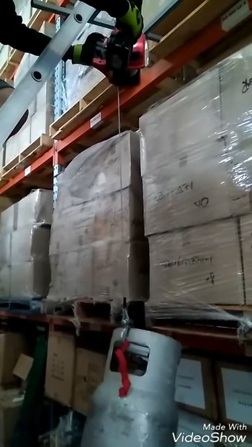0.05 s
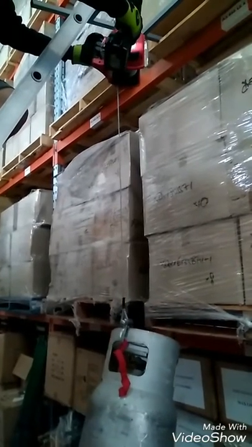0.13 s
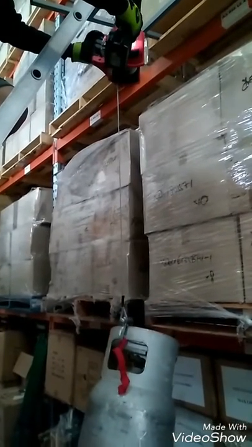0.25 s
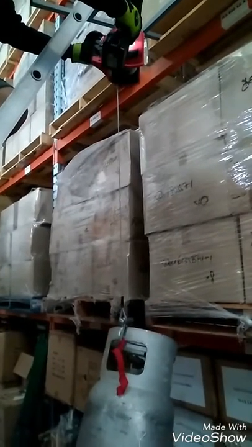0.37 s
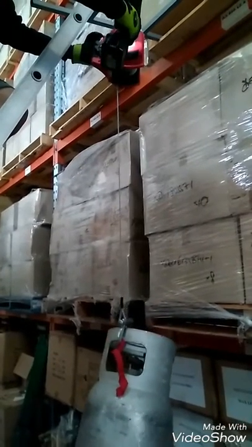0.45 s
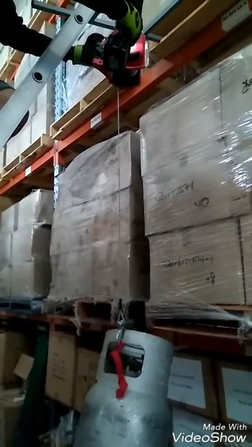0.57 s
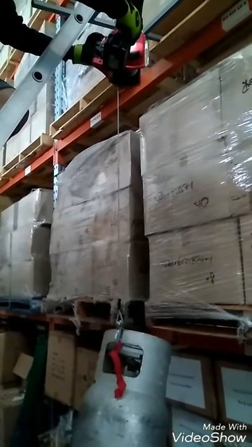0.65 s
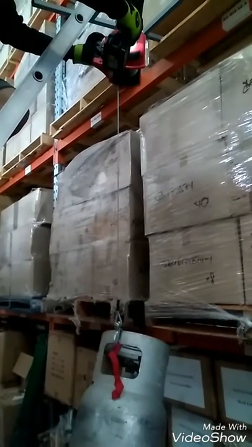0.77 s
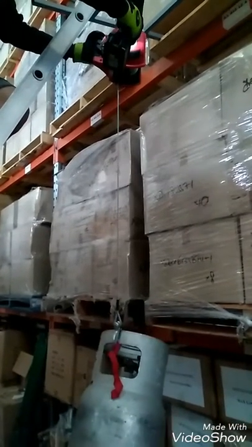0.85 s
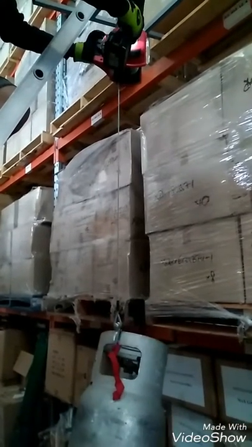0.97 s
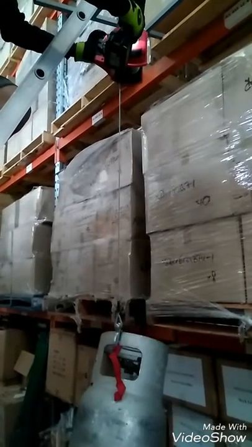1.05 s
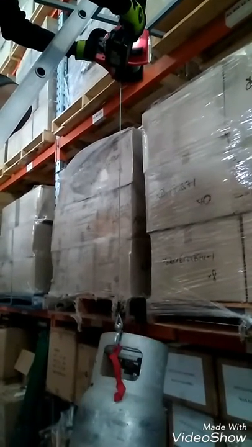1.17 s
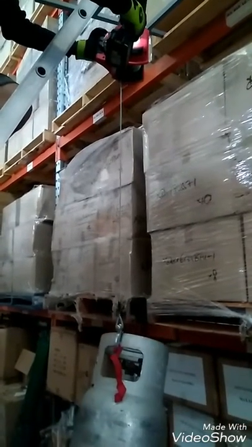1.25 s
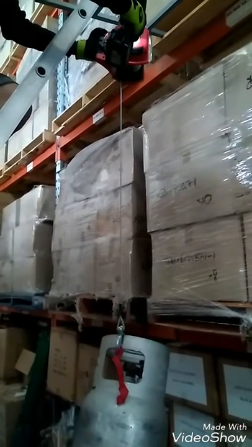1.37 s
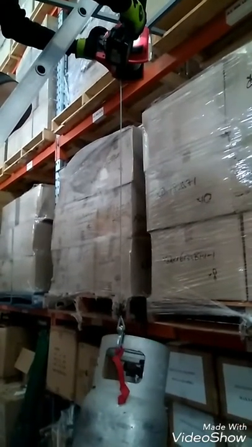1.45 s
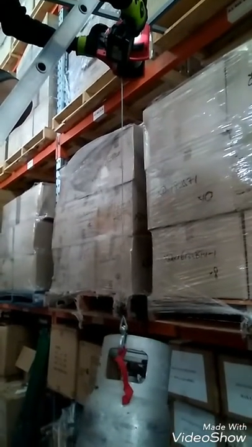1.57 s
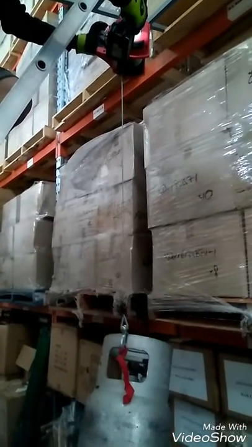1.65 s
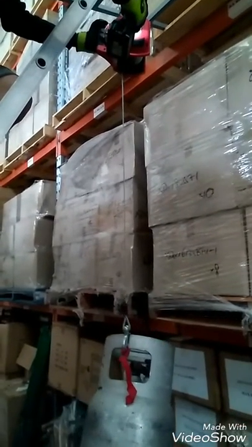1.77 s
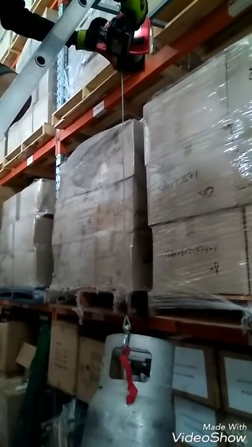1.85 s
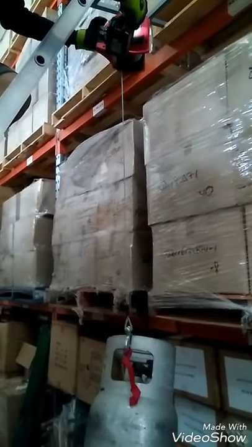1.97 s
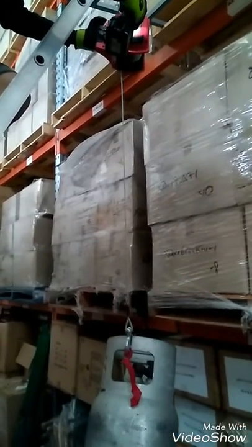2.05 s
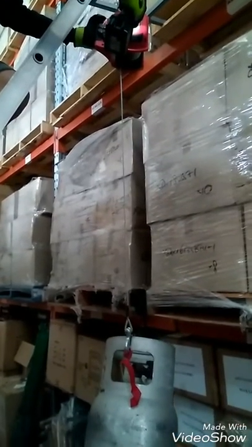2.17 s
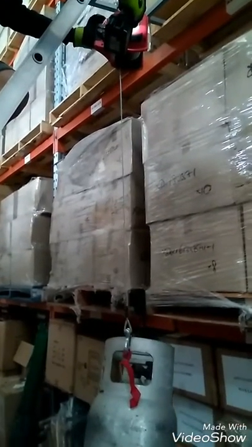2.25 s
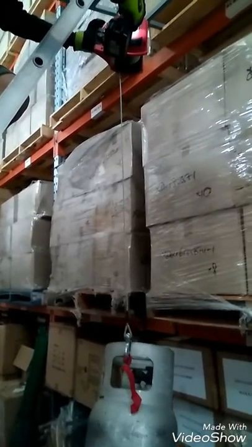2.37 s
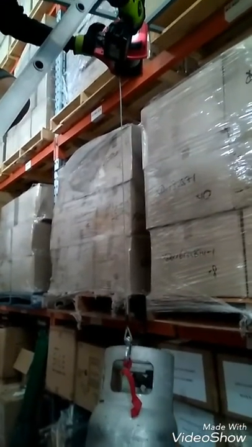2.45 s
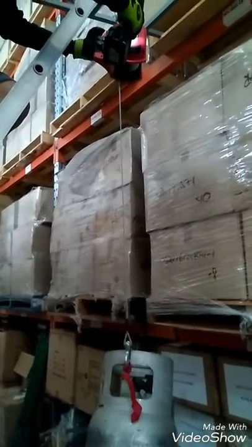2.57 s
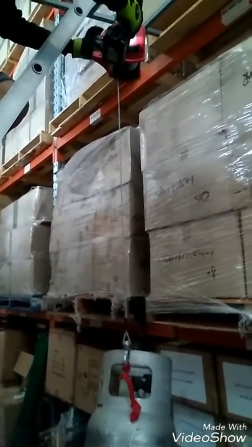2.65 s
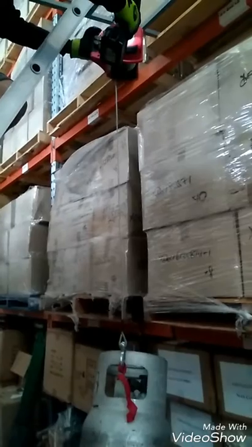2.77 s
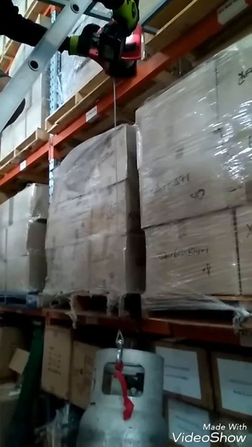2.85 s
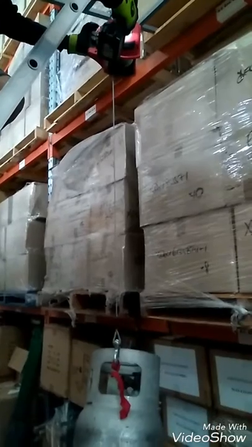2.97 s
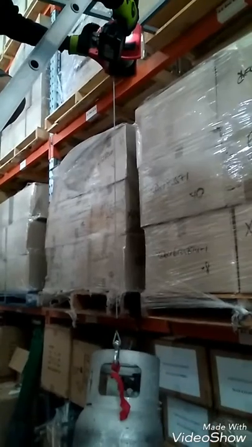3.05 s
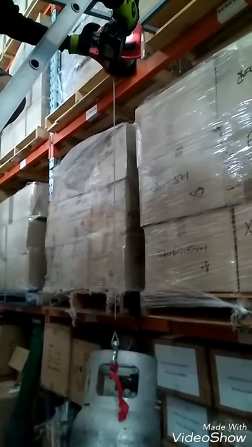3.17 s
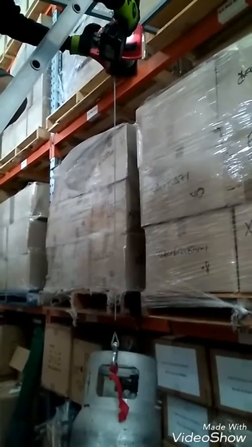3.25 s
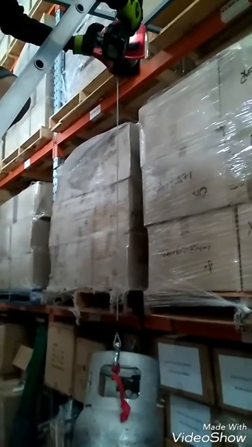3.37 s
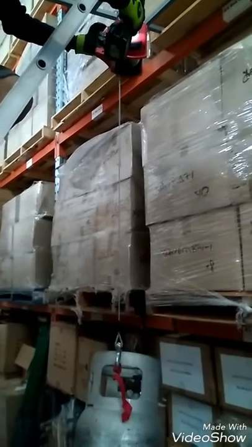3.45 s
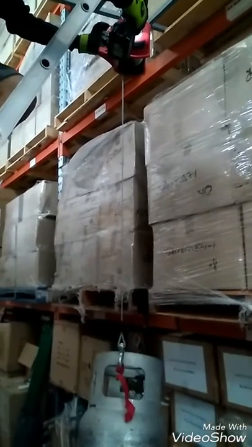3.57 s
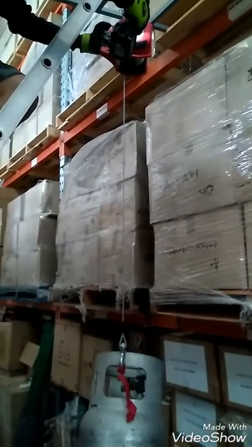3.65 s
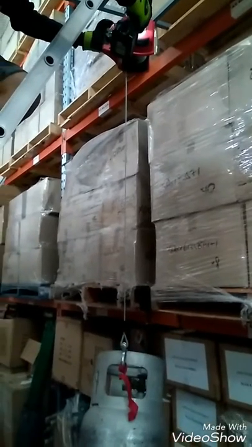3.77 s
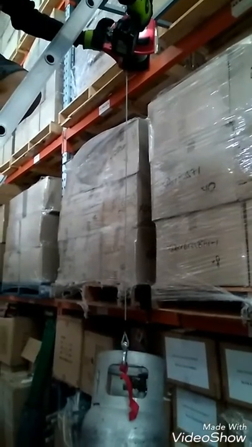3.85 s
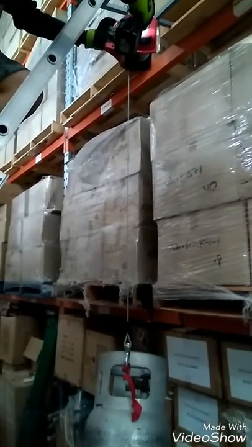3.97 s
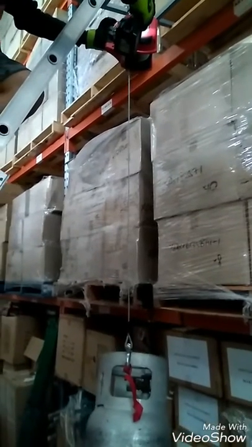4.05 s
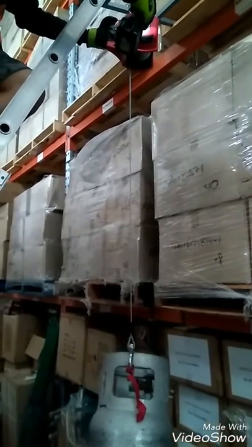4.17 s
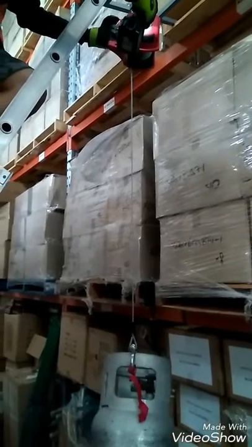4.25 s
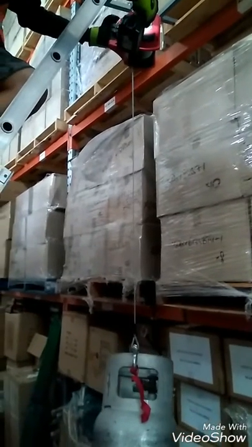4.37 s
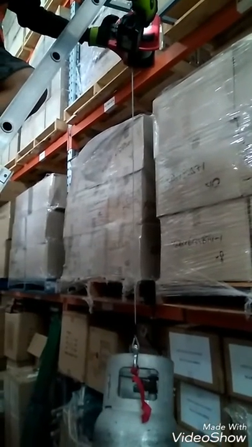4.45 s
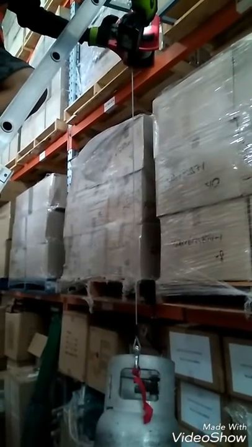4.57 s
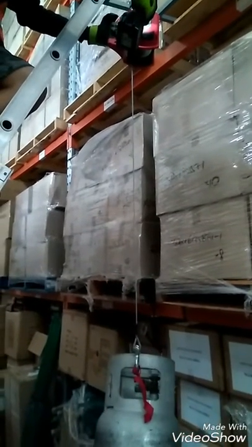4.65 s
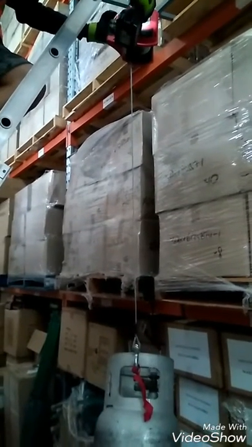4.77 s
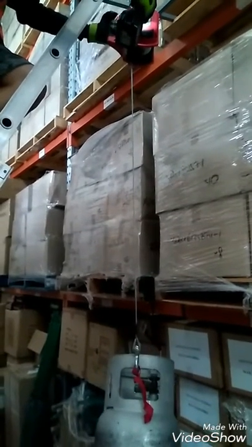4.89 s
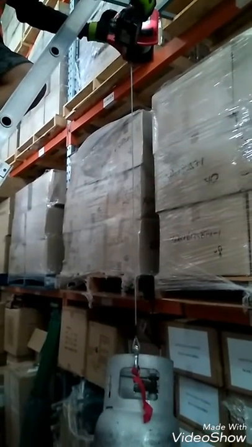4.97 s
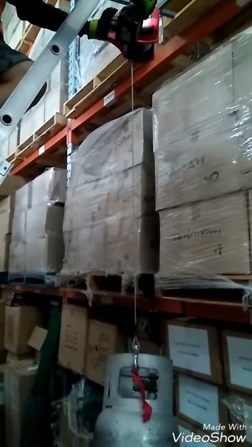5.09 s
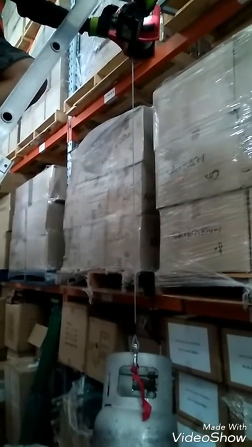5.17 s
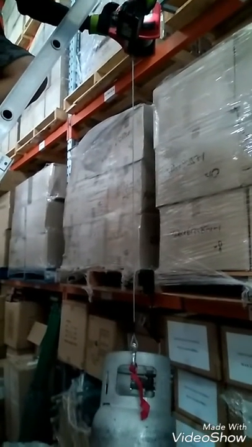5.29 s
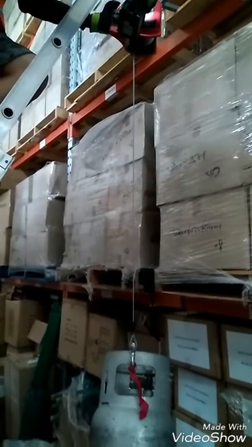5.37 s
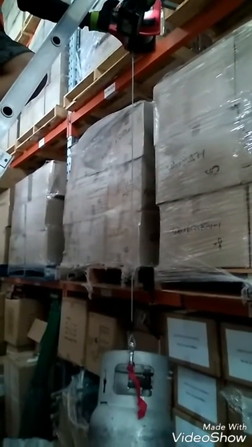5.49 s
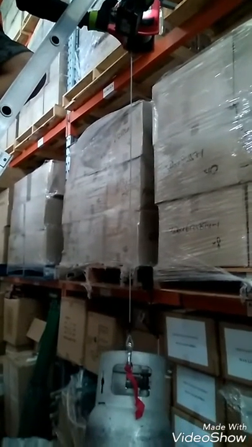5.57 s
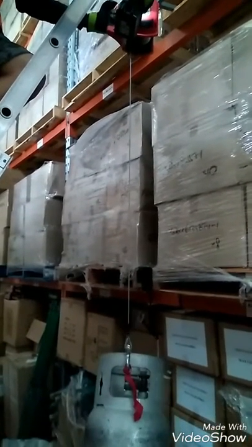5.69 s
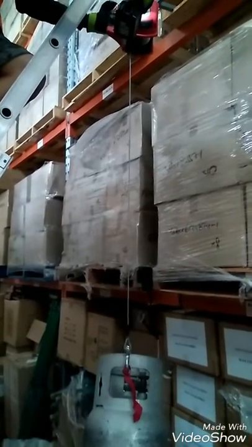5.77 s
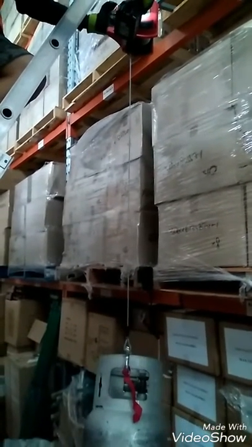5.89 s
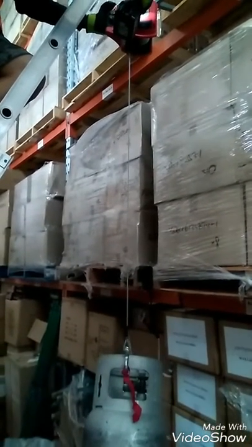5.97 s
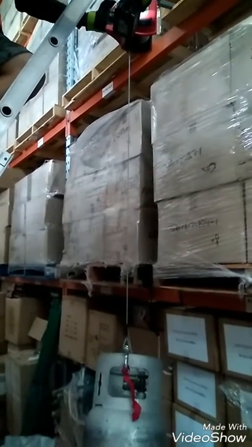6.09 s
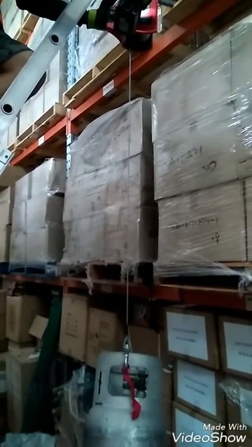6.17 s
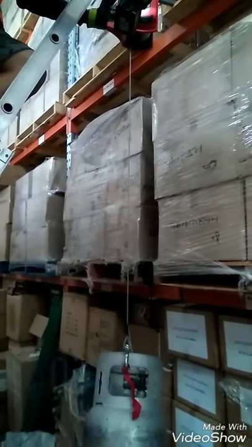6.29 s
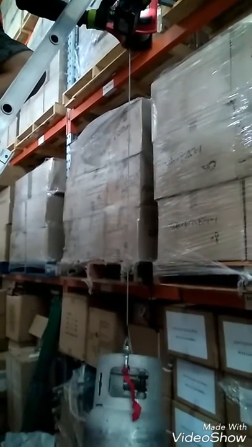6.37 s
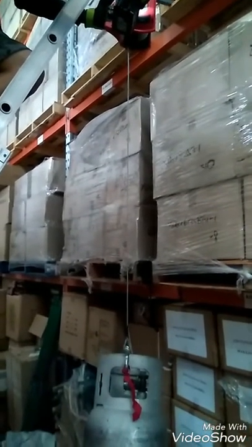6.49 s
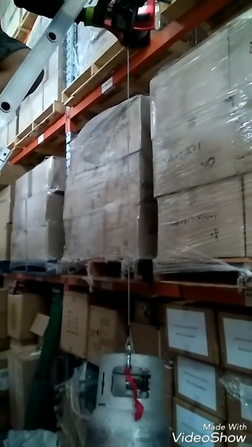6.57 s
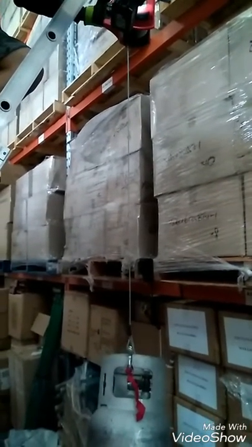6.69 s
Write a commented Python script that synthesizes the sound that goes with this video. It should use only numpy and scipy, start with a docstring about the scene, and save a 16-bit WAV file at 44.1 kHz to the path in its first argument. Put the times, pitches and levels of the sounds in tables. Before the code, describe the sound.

A cordless drill whines and grinds as it turns a loaded cable winch, stopping briefly, then running steadily in a warehouse.

```python
"""A warehouse, close to a cable winch: a cordless drill turns it to hoist a gas cylinder.
The drill stops, is eased on again and runs up to full speed. Its motor whines, its gear teeth hiss
and chatter, and loose steel rattles. The loaded winch squeaks, and growls as its gears knock
bracket, drum and frame. Farther off are the ventilation and a short echo from the racks.
One microphone hears it all, in mono, with the bass cut."""
import sys
import numpy as np
from scipy import signal
from scipy.fft import rfft, irfft
from scipy.io import wavfile

SR = 44100
rng = np.random.default_rng(int(sys.argv[2]) if len(sys.argv) > 2 else 0)


def bounce(signal):
    """Save signal as a 16-bit WAV file at the path given by the first command-line argument."""
    frames = np.transpose(np.atleast_2d(signal))
    limited = np.clip(frames, -1, 1)
    pcm = np.round(limited * 32767).astype(np.int16)
    wavfile.write(sys.argv[1], SR, pcm)


N = 296793
TIME = np.arange(N) / SR
START_SPEED, CRUISE_SPEED = 289, 352  # motor shaft [turns/s]; pace is speed / CRUISE_SPEED
MID_LIFT_S = 3.5  # slow drifts pass through zero here

# moves of the trigger finger: (time [s], new speed [turns/s], rise [s], damping [0-1], gear strain [dB])
TRIGGER_MOVES = [(.058, 0, .045, .98, 0), (.405, 76, .035, .9, -.3), (.485, 162, .075, .8, -.3),
                 (.742, 288.2, .13, .68, .6), (1.212, 348.1, .132, .7, 0), (3.325, 388.2, .224, .85, .25),
                 (4.19, 355.4, .314, .8, -.5), (5.6, 353.6, 1.2, .9, -.8)]
# motor whine: (frequency [x shaft speed], relative level [dB], gain above cruising [dB per turn/s])
WHINE_PARTIALS = [(23.25, -16, .28), (23.34, -16, .17), (23.5, 0, -.04), (23.86, -17, 0),
                  (24.02, -8.5, -.08), (39.61, -19, -.45)]
# tooth harmonics and their sidebands: (frequency [x planet gear speed], relative level [dB])
MESH_PARTIALS = [(12, -9), (20, -3), (22, -8), (23, -8), (24, -6), (26, -4), (27, -8), (29, -6), (34, -10),
                 (35, -7), (38, -6), (39, -7), (40, 0), (41, -6), (42, -9), (44, -9), (45, -11), (49, -14),
                 (50, -11), (51, -8), (58, -14)]
PLANET_RATIO = .7746  # planet gear turns per shaft turn
# the teeth bind and loosen as the planet carrier goes round: (rate [x carrier speed], depth [dB])
TOOTH_BINDING = [(2, 1.), (3, 1.7), (5, 1.1), (6, .8), (7, 1.), (10, .8), (15, .6), (30, .5)]
# how well the gear housing gives off the mesh tones: (frequency [Hz], gain [dB])
HOUSING_RESPONSE = [(4400, -11), (5300, -1), (5900, -5), (8000, -1), (8800, 1), (11400, 0), (14100, 1),
                    (15200, -11)]
# swells and dips of the whine and of the mesh: (time [s], gain [dB])
WHINE_SWAY = [(0, -2), (.9, -3), (1.2, -3), (1.275, 8), (1.32, 1), (1.45, 1), (2, 1.3), (3.25, .5),
              (3.42, -3), (3.65, -3.5), (4.05, -3), (4.25, -3), (4.4, -5), (4.52, 2), (4.68, 1), (4.85, .5),
              (5.6, 1.5), (6.5, 1.5), (6.73, -1.5)]
MESH_SWAY = [(0, 8), (.88, 8), (1.25, 8), (1.36, 0), (1.43, -1), (1.49, 6), (1.58, 0), (1.75, .5),
             (1.9, 2.5), (2.3, 2.5), (2.55, 2), (2.7, -2), (3.05, 2), (3.27, -7), (3.55, 1), (3.7, 1),
             (4.6, 2), (5.4, 3), (6.1, 3.5)]
# hiss of sliding teeth, running fast and running slowly: (frequency [Hz], relative level [dB])
FAST_HISS = [(1200, -33), (2000, 0.5), (2800, 2.5), (3700, -0.5), (4200, 0), (4500, 0), (4750, 2),
             (5400, 2), (6150, 1), (6600, 5.5), (7150, 3), (7800, 4.5), (9500, 4), (10900, 2.5),
             (12800, -3.5), (15500, -10.5)]
SLOW_HISS = [(1200, -26), (2000, 2.5), (2800, 1.5), (3700, -2.5), (5000, -0.5), (6000, -1), (6650, 2),
             (8000, 3.5), (9500, 4), (11300, 2), (12200, -2), (13500, -7), (15500, -15)]
# the gears take up their slack: (time [s], relative level [dB])
CLACKS = [(.413, -31), (.834, -17)]

# resonances of the winch's steel parts at mid-lift, drifting as the cable winds on:
# (frequency [Hz], width [Hz], relative level [dB], pitch drift [Hz/s], level drift [dB/s])
BRACKET_MODES = [(505, 47, -0.5, 4, -1), (664.7, 33, -1, 3, -1.3), (742, 75, -1, -0.5, 1.6)]
DRUM_MODES = [(921, 133, -10, 3, 0.45), (1007, 74, -2, 9, -0.22), (1112, 43, -10, -1, -0.47)]
FRAME_MODES = [(1209, 64, -8.5, 1.5, -0.6), (1386, 63, 1.5, 8, 0.21), (1458, 49, -0.5, 3.5, -0.38),
               (1558, 150, -9, 3, 0.16), (1783, 93, -8.5, 3, -0.23), (1892, 115, -9, 15, 0.41),
               (2015, 67, -7, 1, 0.095), (2110, 52, -9, -7, 0.23), (2428, 150, -12.5, 6, -0.45)]
# the casing's rumble and its thicker middle: (frequency [Hz], relative level [dB])
CASING_SPECTRUM = [(70, -48), (110, -31), (140, -20), (175, 0.5), (250, 2.5), (350, 8), (450, 4),
                   (600, 1.5), (780, 0.5), (1200, 12), (2200, -10.5)]
BOOM_SPECTRUM = [(280, -28), (430, -2.5), (600, -2.5), (760, 2), (900, -4.5), (1200, -32.5)]
# the loaded winch jolts: (time [s], relative drum level [dB], relative frame level [dB])
JOLTS = [(.792, -21, -30), (.836, -20, -21), (.935, -23, -30), (1.159, -19, -27), (1.41, -20, -25),
         (1.96, -20, -25), (2.107, -28, -20), (2.235, -19, -24), (2.67, -34, -18), (3.05, -19, -26),
         (3.15, -21, -20), (3.22, -26, -19), (3.311, -27, -21), (3.58, -25, -19), (3.79, -32, -18),
         (3.861, -20, -20), (4.14, -19, -20), (4.309, -19, -24), (4.351, -19, -28), (4.431, -21, -22),
         (4.649, -22, -18), (4.855, -27, -16), (5.12, -21, -21), (5.529, -18, -28), (5.68, -19, -21),
         (5.88, -19, -25), (5.972, -19, -21), (6.52, -18, -23)]
# the loaded winch squeaks, and once the low groan swells briefly: (time [s], length [s], frequency [Hz], level
# [dB])
SQUEAKS = [(.768, .06, 4045, -41.5), (.888, .04, 6520, -36), (1.93, .05, 1990, -32), (2.13, .04, 4995, -38),
           (3.81, .04, 6718, -32.5), (3.86, .04, 6632, -33), (4.1, .05, 6632, -33), (4.51, .06, 735, -35),
           (5.96, .06, 6632, -35)]

# each part's loudness: (base level at cruising [dB], extra gain [dB per unit of pace], drift [dB/s])
WHINE_LEVEL = (-40.5, 8.6, 0)
MESH_LEVEL = (-46, 14, -.1)
HUM_LEVEL = (-54.5, 13, -0.4)
DRONE_LEVEL = (-53.7, 10, 2.2)
HISS_LEVEL = (-23, 4.1, 0.23)
BRACKET_LEVEL = (-41, -2.5, 0.26)
DRUM_LEVEL = (-29, 1.1, 0.48)
FRAME_LEVEL = (-25.5, 7.5, -0.21)

# ventilation noise and the building's steady hum: (frequency [Hz], relative level [dB])
VENTILATION_SPECTRUM = [(35, -69), (60, -51), (204, -8), (289, -6), (390, -13), (711, -7), (780, -8),
                        (875, -14), (1360, -10), (3050, -18), (4700, -18), (7500, -24), (11000, -19.5),
                        (15000, -36)]
BUILDING_HUM = [(398.4, -54.5), (802.1, -55.5), (1001, -60), (1351, -57), (1803, -57), (1997, -59)]
# the hall's reverberation: (frequency [Hz], time to fall 60 dB [s])
HALL_DECAY = [(200, 0.17), (1200, 0.5), (4000, 0.52), (8000, 0.4), (12000, 0.53)]


def motor_whine(speed, turns, strain_db):
    """The motor whines in a cluster of high tones, louder under strain and rougher at top speed."""
    housing_db = housing_gain(23.5 * speed, centre_hz=9480, width_hz=2250, peak_db=12)
    whine_db = level(WHINE_LEVEL, speed) + housing_db + 5.7 * strain_db + curve(WHINE_SWAY)
    roughness = .25 * np.maximum(speed / CRUISE_SPEED, 1) ** 6
    overspeed = np.maximum(speed - CRUISE_SPEED, 0)
    whine = sum(amp(db + slope * overspeed) * tone(order * turns, flutter=roughness, flutter_hz=30)
                for order, db, slope in WHINE_PARTIALS)
    return amp(whine_db) * whine


def planet_mesh(speed, turns, strain_db):
    """The planet gears' teeth meet and sing through the housing, louder under strain."""
    mesh = np.zeros(N)
    for order, db in MESH_PARTIALS:
        hz = order * PLANET_RATIO * speed
        ring_db = housing_gain(hz, centre_hz=10770, width_hz=120, peak_db=8)
        partial = tone(order * PLANET_RATIO * turns, flutter=.2, flutter_hz=14)
        mesh += amp(db + at_frequency(HOUSING_RESPONSE, hz) + ring_db) * partial
    return amp(level(MESH_LEVEL, speed) + 2.7 * strain_db + curve(MESH_SWAY)) * mesh


def shaft_hum(speed, turns):
    """The shaft hums at its turning rate, swelling on a housing resonance."""
    hum_db = level(HUM_LEVEL, speed) + housing_gain(speed, centre_hz=341, width_hz=15, peak_db=11.4)
    return amp(hum_db) * tone(turns, flutter=.45, flutter_hz=20)


def gear_drone(speed, turns, order=1.5):
    """The gear train drones a fifth above the shaft, growing as the load rises."""
    housing_db = housing_gain(order * speed, centre_hz=528, width_hz=30, peak_db=6.8)
    return amp(level(DRONE_LEVEL, speed) + housing_db) * tone(order * turns, flutter=.3, flutter_hz=12)


def gear_tones(speed, turns, hiss_db):
    """A faint groan grows with speed; as the load rises the tooth tone fades and the pinion's grows."""
    groan_order, tooth_order, pinion_order = 1.91, 7.746, 8.06  # multiples of the shaft speed
    from_mid_s = TIME - MID_LIFT_S
    groan_db = -25 + .12 * (speed - CRUISE_SPEED)
    groan = amp(groan_db) * tone(groan_order * turns, flutter=.4, flutter_hz=14)
    tooth = amp(-20 - from_mid_s) * tone(tooth_order * turns, flutter=.18, flutter_hz=22)
    housing_db = housing_gain(pinion_order * speed, centre_hz=2330, width_hz=200, peak_db=13.3)
    pinion_db = -21.5 + housing_db + 1.1 * from_mid_s
    pinion = amp(pinion_db) * tone(pinion_order * turns, flutter=.35, flutter_hz=20)
    return amp(hiss_db) * (groan + tooth + pinion)


def gear_hiss(pace, pressure_db, hiss_db):
    """Sliding teeth hiss; loose ones chatter and now and then ping the steel."""
    chatter = knocks(3000 * pace, spread_db=1)
    rub = noise() + amp(-6) * chatter
    slowness = np.clip((1 - pace) / .16, 0, 1)
    hiss = (1 - slowness) * colour(rub, FAST_HISS) + slowness * amp(.66) * colour(rub, SLOW_HISS)
    pings = resonate(knocks(200 * pace, spread_db=0), hz=8350, width_hz=840)
    return amp(hiss_db + .3 * pressure_db + .9 * wander(30)) * (amp(-.2) * hiss + amp(-21) * pings)


def winch_growl(speed, turns, pressure_db):
    """Drum, frame and bracket growl under load, with a short surge as the cable comes taut."""
    pace = speed / CRUISE_SPEED
    bite_s, bite_rise_s = .83, .047
    bite_age = np.maximum(TIME - bite_s, 0) / bite_rise_s
    bite_db = bite_age * np.exp(1 - bite_age)
    drum_db = level(DRUM_LEVEL, speed) + .66 * shaft_drag(turns, lead_turns=0) + bite_db
    frame_db = level(FRAME_LEVEL, np.minimum(speed, 376)) + .88 * bite_db  # no louder past 376 turns/s
    drum = amp(drum_db) * steel_ring(DRUM_MODES, pace, pressure_db, throb_db=.6)
    frame = amp(frame_db) * steel_ring(FRAME_MODES, pace, pressure_db, throb_db=.2)
    bracket = steel_ring(BRACKET_MODES, pace, pressure_db, throb_db=1.5)
    return drum + frame + amp(level(BRACKET_LEVEL, speed)) * bracket


def steel_ring(modes, pace, pressure_db, throb_db):
    """The winch gears knock one steel part, whose ring drifts as the cable winds on."""
    blows = knocks(1200 * pace, spread_db=2.2) + amp(-2) * noise()
    blows *= amp(.5 * pressure_db + throb_db * wander(16))
    ring, from_mid_s = np.zeros(N), TIME - MID_LIFT_S
    for k, (hz, width_hz, db, hz_per_s, db_per_s) in enumerate(modes):
        mode_hz = hz * (1 + .005 * wander(7)) + hz_per_s * from_mid_s  # wobbles as the load shifts
        delayed = np.roll(blows, 61 * k)  # each mode feels the blows a moment after the last
        ring += amp(db + db_per_s * from_mid_s) * resonate(delayed, mode_hz, width_hz)
    return unit(ring)


def casing_rumble(hiss_db, thicken_s=3.5, thicken_over_s=.069, thicken_db=5):
    """The casing rumbles, dull and uneven; the sound thickens midway and stays so."""
    rumble = colour(noise(), CASING_SPECTRUM) * amp(2 * wander(10))
    thickness = np.clip((TIME - thicken_s) / thicken_over_s, 0, 1)
    boom = amp(thicken_db * thickness - 21.5) * colour(noise(), BOOM_SPECTRUM)
    return amp(hiss_db) * (amp(-13.5) * rumble + boom)


def rattle(hiss_db, ticks_per_s=150, low_hz=1700, high_hz=8200, spread_db=14):
    """Loose steel parts tick at random, each with a brief partial of its own."""
    ticks, age = np.zeros(N + SR // 4), TIME[:SR // 4]
    fade = strike(age, rise_s=.002, t60_s=.22)
    for when, pitch, size, phase in rng.random((round(ticks_per_s * N / SR), 4)):
        hz = low_hz + (high_hz - low_hz) * pitch
        ring = np.sin(2 * np.pi * (hz * age + phase))
        ticks[int(when * N):][:len(age)] += amp(spread_db * size) * fade * ring
    return amp(hiss_db - 12.5) * colour(ticks[:N], FAST_HISS)


def squeaks():
    """Steel rubs on steel and sings for a moment, swelling and fading; once, the low groan near 735 Hz swells
    the same way."""
    out = np.zeros(N)
    for peak_s, length_s, hz, db in SQUEAKS:
        swell = np.exp(-(2 * (TIME - peak_s) / length_s) ** 2)
        out += amp(db) * swell * tone(hz * TIME, flutter=.5, flutter_hz=40)
    return out


def clacks(t60_s=.067):
    """Short knocks as the teeth meet: a bright snap, and the drum rings."""
    fade = sum(amp(db - 60 * np.maximum(TIME - s, 0) / t60_s) * (TIME >= s) for s, db in CLACKS)
    ring = unit(sum(amp(db) * resonate(noise(), hz, width_hz) for hz, width_hz, db, _, _ in DRUM_MODES))
    snap = colour(noise(), FAST_HISS)
    return fade * (amp(-12) * snap + amp(-26) * ring)


def jolts():
    """Single harder knocks of the winch ring the drum and the frame."""
    out, age = np.zeros(N), TIME[:SR // 5]
    fade = amp(-2.5) * strike(age, rise_s=.006, t60_s=.19)
    for start_s, drum_db, frame_db in JOLTS:
        for modes, part_db in ((DRUM_MODES, drum_db), (FRAME_MODES, frame_db)):
            ring = sum(amp(db) * sine((hz + hz_per_s * (start_s - MID_LIFT_S)) * age)
                       for hz, _, db, hz_per_s, _ in modes)
            out[round(start_s * SR):][:len(age)] += amp(part_db) * fade * unit(ring)
    return out


def thud(start_s=1.695):
    """One soft, low bump dies away under the gear noise."""
    fade = strike(np.maximum(TIME - start_s, 0), rise_s=.015, t60_s=.35)
    return amp(-35) * fade * resonate(noise(), hz=198, width_hz=46)


def hall_echo(direct, delay_s=.006):
    """A diffuse tail comes back from the racks just behind the direct sound, shortest in the bass."""
    hz, age, spectra = signal.stft(rng.standard_normal(SR) * (TIME[:SR] > delay_s), SR, nperseg=256)
    t60_s = at_frequency(HALL_DECAY, hz)[:, None]
    _, tail = signal.istft(spectra * amp(-60 * age / t60_s) / np.sqrt(t60_s), SR, nperseg=256)
    return signal.fftconvolve(direct, tail / np.linalg.norm(tail))[:N]


def room_tone():
    """Far behind the winch, the ventilation rushes and the building hums faintly."""
    hum = sum(amp(db) * np.sqrt(2) * sine(hz * TIME) for hz, db in BUILDING_HUM)
    return amp(-48.5) * colour(noise(), VENTILATION_SPECTRUM) + amp(-5) * hum


def follow_trigger():
    """Speed and strain settle on each trigger setting like a damped spring, overshooting a little."""
    previous = np.array([START_SPEED, 0])
    state = np.outer(previous, np.ones(N))
    for start_s, speed, rise_s, damping, strain_db in TRIGGER_MOVES:
        goal = np.array([speed, strain_db])
        age = np.pi * np.maximum(TIME - start_s, 0) / rise_s
        swing = np.sqrt(1 - damping ** 2)
        remaining = np.exp(-damping * age) * (np.cos(swing * age) + damping / swing * np.sin(swing * age))
        state += np.outer(goal - previous, 1 - remaining)
        previous = goal
    return np.maximum(state[0], 1), state[1]


def tooth_pressure(turns):
    """Tooth pressure in dB, cycling with the planet carrier."""
    carrier_turns = turns * PLANET_RATIO / 15
    return sum(db * sine(order * carrier_turns) for order, db in TOOTH_BINDING)


def shaft_drag(turns, lead_turns, gearing=95.8, peak_s=4.375):
    """The winch's input shaft drags once in each of its turns: a swing of +-1."""
    input_turns = (turns - np.interp(peak_s, TIME, turns)) / gearing
    return np.cos(2 * np.pi * (input_turns + lead_turns))


def level(law, speed):
    """A part's level in dB: its vibration grows with speed and drifts slowly as the load rises."""
    cruise_db, db_per_pace, db_per_s = law
    pace = speed / CRUISE_SPEED
    return cruise_db + 20 * np.log10(pace) + db_per_pace * (pace - 1) + db_per_s * (TIME - MID_LIFT_S)


def housing_gain(hz, centre_hz, width_hz, peak_db):
    """The dB that a tone gains near a housing resonance."""
    return peak_db * np.exp(-((hz - centre_hz) / width_hz) ** 2)


def tone(cycles, flutter, flutter_hz):
    """A tone of rms near 1 that follows a cycle count, fluttering in strength and phase."""
    strength = np.sqrt(2) * (1 + flutter * wander(flutter_hz))
    return strength * np.sin(2 * np.pi * (cycles + rng.random()) + flutter * wander(flutter_hz))


def knocks(per_s, spread_db):
    """Tiny impacts at random times; spread_db makes a few larger than the rest."""
    size = amp(spread_db * np.minimum(rng.exponential(1, N), 3.5))
    return unit(size * rng.choice([-1, 1], N) * (rng.random(N) < per_s / SR))


def resonate(x, hz, width_hz):
    """A steep resonance at hz, steady or moving, to rms 1."""
    rotation = np.exp(2j * np.pi * np.cumsum(np.broadcast_to(hz, N)) / SR)
    pole = np.exp(-np.pi * width_hz * np.sqrt(2) / SR)
    envelope = signal.lfilter([(1 - pole) ** 2], [1, -2 * pole, pole ** 2], x / rotation)
    return unit((rotation * envelope).real)


def strike(age, rise_s, t60_s):
    """A straight rise on a decay that loses 60 dB in t60_s."""
    return np.minimum(age / rise_s, 1) * amp(-60 * age / t60_s)


def wander(hz):
    """Slow random motion of rms 1, up to about hz."""
    count, rate_hz = 8192, 1000
    lowpass = 1 / (1 + (np.fft.rfftfreq(count, 1 / rate_hz) / hz) ** 4)
    slow = irfft(rfft(rng.standard_normal(count)) * lowpass)
    return unit(np.interp(TIME, np.arange(count) / rate_hz, slow))


def colour(x, spectrum, size=2 ** 19):
    """Filters by a spectrum, to rms 1."""
    gain = amp(at_frequency(spectrum, np.fft.rfftfreq(size, 1 / SR)))
    return unit(irfft(rfft(x, size) * gain)[:N])


def at_frequency(points, hz):
    """Reads a table joined by straight lines on a log-frequency axis."""
    points_hz, values = np.transpose(points)
    return np.interp(np.log(hz + 1), np.log(points_hz), values)


def curve(points):
    """A control joined by straight lines in time."""
    return np.interp(TIME, *np.transpose(points))


def sine(cycles):
    """A sine with a random starting phase."""
    return np.sin(2 * np.pi * (cycles + rng.random()))


def noise():
    """White noise of rms 1."""
    return rng.standard_normal(N)


def amp(db):
    """Decibels to gain."""
    return 10 ** (np.asarray(db) / 20)


def unit(x):
    """Scales to rms 1."""
    return x / np.sqrt(np.mean(x ** 2) + 1e-20)


def scene():
    """Drill and winch up close, driven by one shaft, with the hall behind; both channels are alike."""
    speed, strain_db = follow_trigger()
    turns = np.cumsum(speed * (1 + .00025 * wander(11))) / SR
    pressure_db = tooth_pressure(turns)
    hiss_db = level(HISS_LEVEL, speed) + strain_db + .03 * shaft_drag(turns, lead_turns=.19)
    singing = motor_whine(speed, turns, strain_db) + planet_mesh(speed, turns, strain_db)
    drill = amp(1.4 * pressure_db) * singing + shaft_hum(speed, turns) + gear_drone(speed, turns)
    drill += gear_tones(speed, turns, hiss_db) + gear_hiss(speed / CRUISE_SPEED, pressure_db, hiss_db)
    winch = winch_growl(speed, turns, pressure_db) + casing_rumble(hiss_db)
    machine = drill + winch + rattle(hiss_db) + squeaks() + clacks() + jolts() + thud()
    mono = machine + amp(-12) * hall_echo(machine) + room_tone()
    return np.array([mono, mono])


def record(dry):
    """The microphone cuts the bass below 145 Hz and the treble above 15750 Hz."""
    bass_cut = signal.butter(6, 145, "high", fs=SR, output="sos")
    treble_cut = signal.firwin(511, 15750, window=("kaiser", 9), fs=SR)
    return signal.oaconvolve(signal.sosfilt(bass_cut, dry), treble_cut[None], "same")


dry = scene()
out = record(dry)
bounce(out)
```